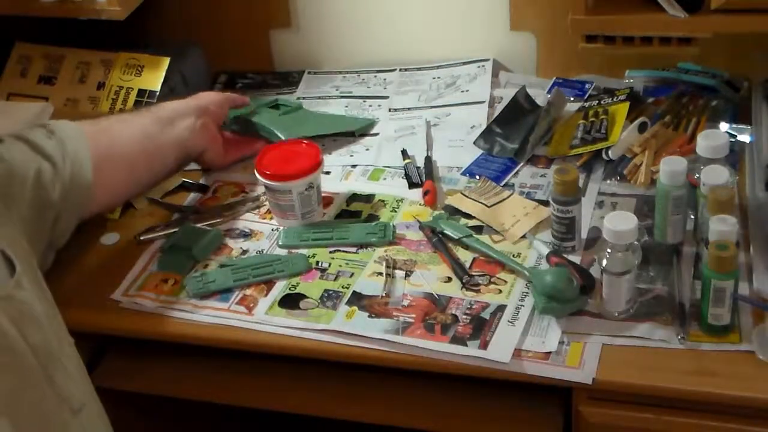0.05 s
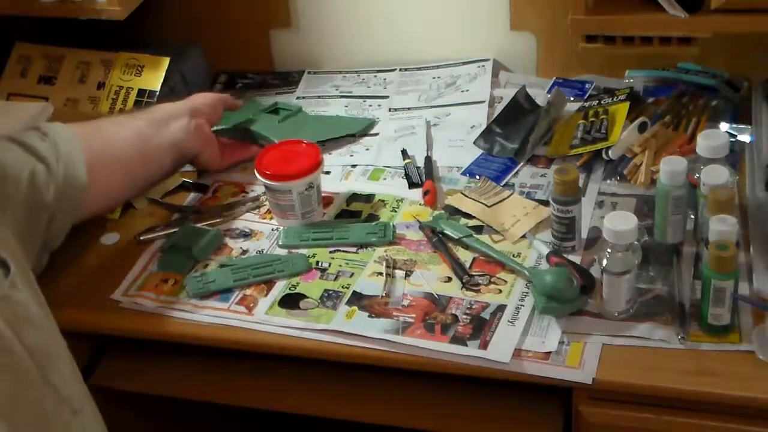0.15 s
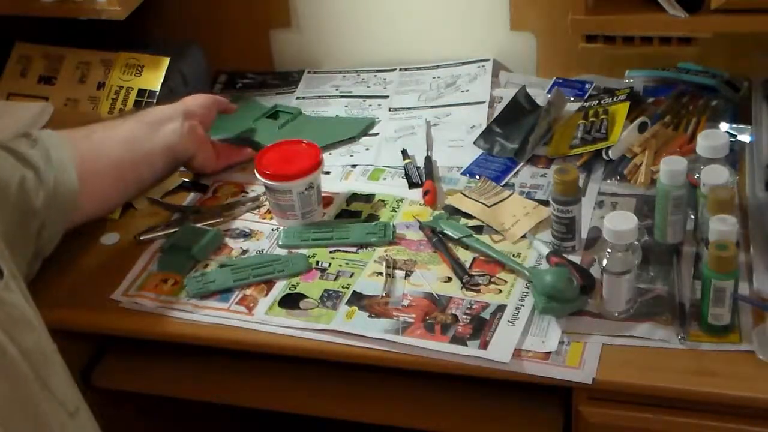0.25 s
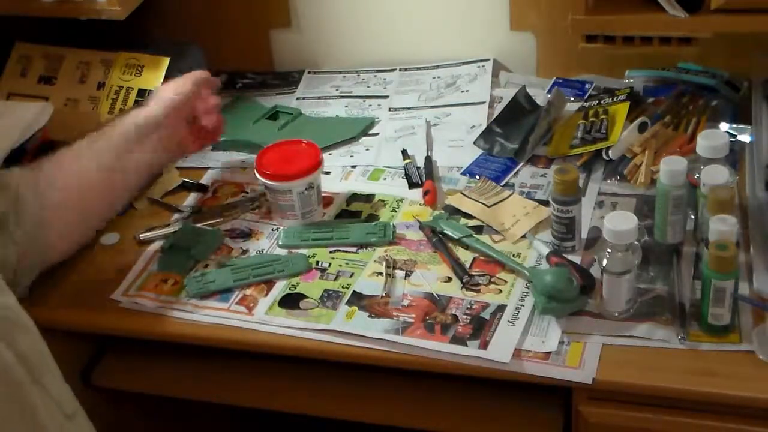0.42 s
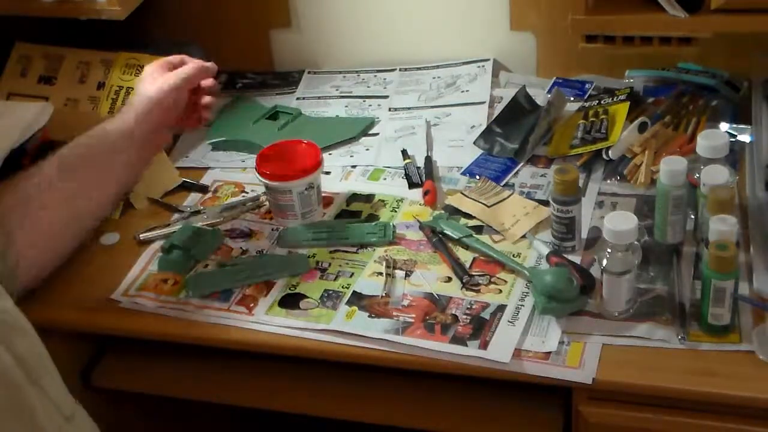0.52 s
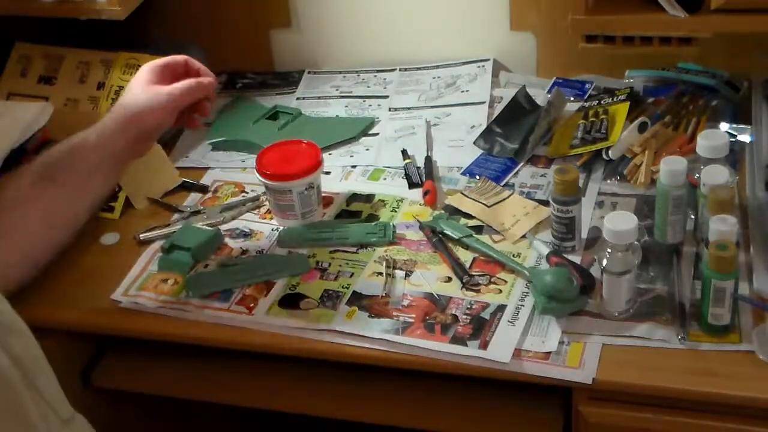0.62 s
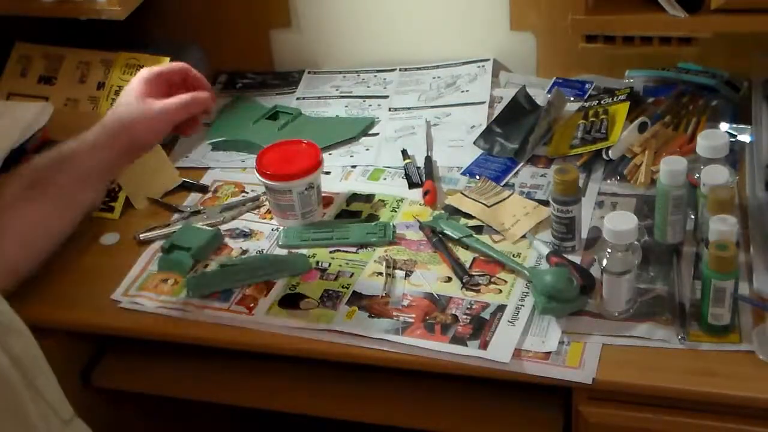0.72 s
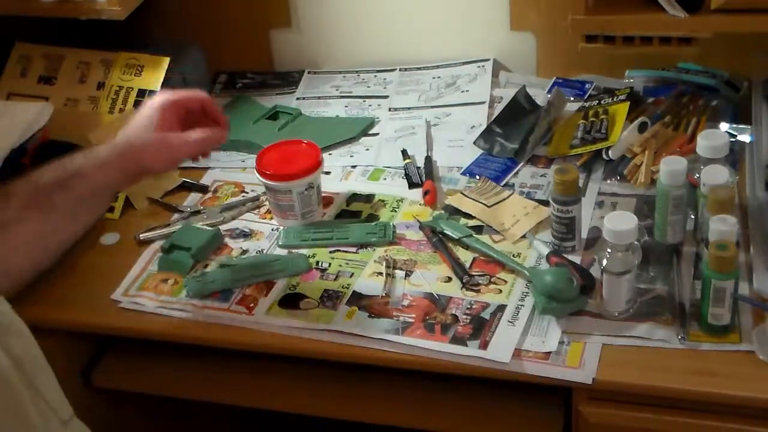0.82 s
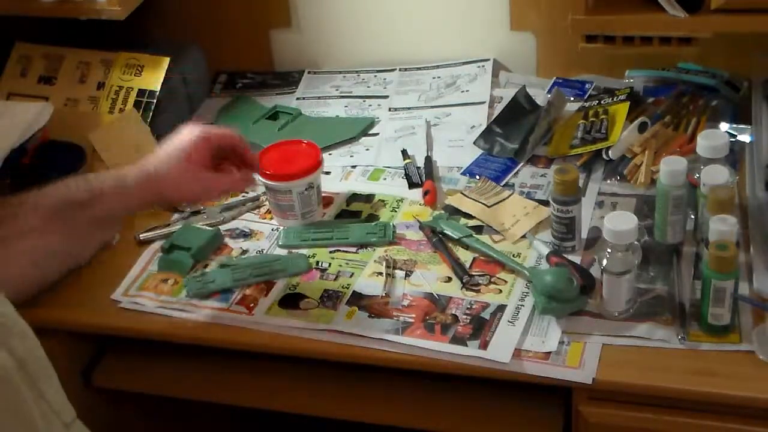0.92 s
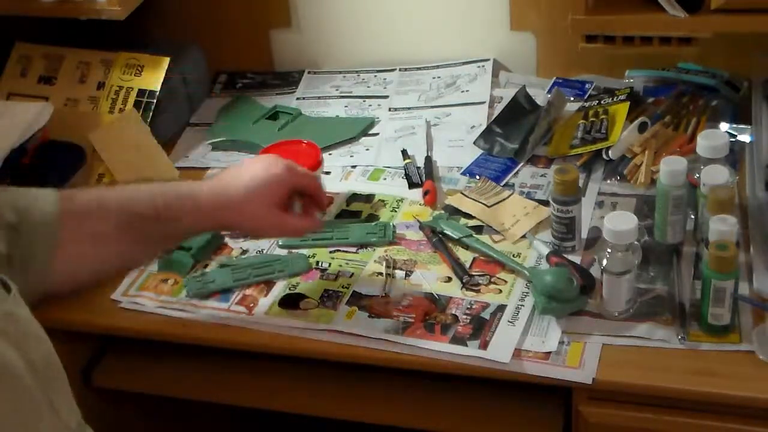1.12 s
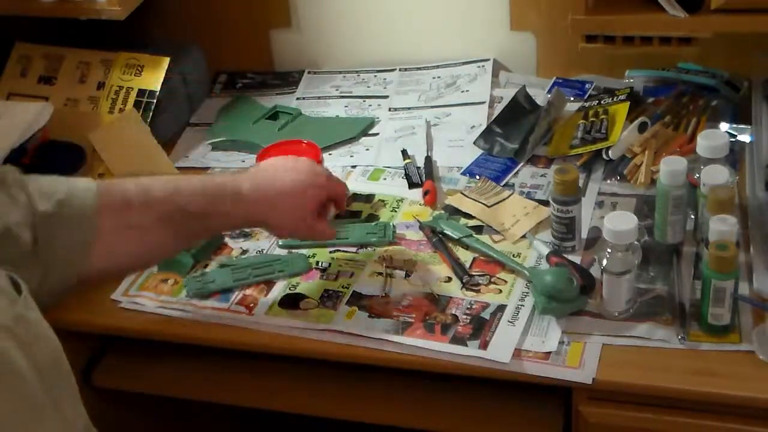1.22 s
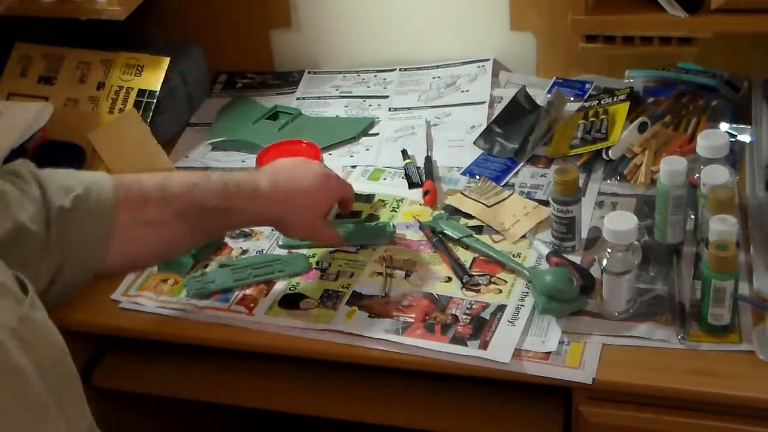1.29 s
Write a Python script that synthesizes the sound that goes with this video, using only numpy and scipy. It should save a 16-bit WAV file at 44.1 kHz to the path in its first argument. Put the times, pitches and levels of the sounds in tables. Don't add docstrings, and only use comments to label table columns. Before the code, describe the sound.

A hollow plastic hull is put down on a newspaper-covered wooden desk, close up in a small room. Faint ticks and paper crackles come at 0.07-0.16 s, a sharp bright knock at 0.24 s, then softer hollow taps crowd together from 0.29 to 0.46 s, fading by 0.6 s. Low rumble and hiss dip around 0.76 s, then recover; barely audible paper ticks follow near 1 s.

```python
import sys
import numpy as np
from scipy import signal
from scipy.fft import rfft, irfft
from scipy.io import wavfile
from scipy.ndimage import uniform_filter1d

SR = 44100
rng = np.random.default_rng(int(sys.argv[2]) if len(sys.argv) > 2 else 0)


def wrap_up_sound(samples):
    columns = np.atleast_2d(samples).T
    tamed = np.clip(columns, -1, 1)
    steps = np.round(tamed * 32767).astype(np.int16)
    wavfile.write(sys.argv[1], SR, steps)


def field_ratio(decibels):
    return 10 ** (np.asarray(decibels, dtype=float) / 20)


N = 59535
LEFT_RIGHT = np.array([[1], [-1]])


def on_log(table, hz):
    table_hz, value = np.array(table).T
    return np.interp(np.log(hz), np.log(table_hz), value)


def unit(x):
    return x / np.sqrt(np.mean(x ** 2))


def band(x, hz, octaves):
    f = np.maximum(np.fft.rfftfreq(x.shape[-1], 1 / SR), 1)
    bell = np.exp(-.5 * (np.log2(f / hz) / octaves) ** 2)
    return irfft(rfft(x) * bell, x.shape[-1])


def walk(rate):
    k = int(SR / rate)
    held = np.repeat(rng.standard_normal(N // k + 1), k)
    return uniform_filter1d(uniform_filter1d(held, k), k)[:N]


def add(out, s, x):
    i = int(s * SR)
    out[i:i + len(x)] += x[:len(out) - i]


def contact_crack(noise, contact_ms):
    lead = 64
    t = np.arange(len(noise)) / SR
    grit = noise * np.exp(-t * 1000 / (28.5 * contact_ms)) * contact_ms
    snap = (t == 0) * 2.2 * (1 - contact_ms) ** 2
    burst = np.roll(grit + snap, lead)
    crack = band(burst, 2410, 0.57) + field_ratio(-29.5) * band(burst, 5500, 0.99)
    return crack / np.abs(crack).max(), lead / SR


# (frequency [Hz], level [dB], decay t60 [s])
SHELL_MODES = [(262, -16, .15), (411, -11, .15), (543, -6, .15), (826, 0, .105), (935, -5, .09),
               (992, 1, .11), (1195, -5, .1), (1253, -8, .13), (1438, -5, .11), (1610, -8, .07),
               (1760, -9, .1), (2120, -11, .07), (2480, -10, .09), (3500, -18, .04)]
# (frequency [Hz], level [dB], decay t60 [s])
DESK_MODES = [(61, -28, 0.13), (138, -14, 0.13), (192, -21, 0.065), (380.2, -14, 0.21), (598.5, -7, 0.13),
              (717, -10, 0.14), (1084, -12, 0.11), (1938, -5.5, 0.053)]
# (time [s], ring level [dB], contact time [ms], crack level [dB])
CONTACTS = [(.110, -51, 0.29, -43.5), (.151, -52, 0.39, -46), (.2407, -25, 0.165, -13.5),
            (0.2427, -36.5, 0.11, -23), (0.2465, -42, 0.16, -22), (.294, -34, 0.44, -42),
            (0.3004, -28, 0.11, -34), (0.32, -32.5, 0.36, -40), (.3065, -61, 0.24, -26),
            (0.3441, -26.5, 0.23, -35), (.349, -33, 0.12, -30), (.358, -37.5, 0.3, -33),
            (.370, -31.5, 0.65, -47), (0.382, -35, 0.25, -44), (0.391, -34.5, 0.35, -50),
            (.403, -37.5, 0.61, -41), (.424, -33, 0.49, -46.5), (.433, -47, .5, -48),
            (0.463, -81, 0.88, -45.5), (.452, -39, 0.17, -48), (.484, -68, 0.58, -53),
            (.513, -49, 0.45, -47.5), (.533, -49.5, 0.28, -41.5), (.592, -54, 0.18, -48)]


def hull_on_desk():
    late_cycles, rise_per_contact = 1.4, 1.0
    scatter_db, detune = 2.5, .007
    out, t = np.zeros(N), np.arange(SR // 3) / SR
    hz, mode_db, t60 = np.vstack([SHELL_MODES, DESK_MODES]).T[:, :, None]
    node_phase = .38 * np.arange(len(hz))[:, None]
    decay = np.exp(-np.log(1000) * t / t60)
    chance = rng.standard_normal((len(CONTACTS), 3, len(hz), 1))
    noises = rng.standard_normal((len(CONTACTS), 2048))
    for (s, db, ms, crack_db), (level, pitch, phase), noise in zip(CONTACTS, chance, noises):
        push = 1 / (1 + (hz * ms / 1000 * 2) ** 2)
        rise_s = late_cycles / hz + ms * rise_per_contact / 1000
        bloom = 1 - np.exp(-(t / rise_s) ** 2)
        turns = hz * (1 + detune * pitch) * t + node_phase + 0.11 * phase
        ring = np.sin(2 * np.pi * turns) * decay
        strength = field_ratio(mode_db + scatter_db * level) * push
        add(out, s, field_ratio(db) * np.sum(strength * bloom * ring, axis=0))
        crack, lead_s = contact_crack(noise, ms)
        add(out, s - lead_s, field_ratio(crack_db) * crack)
    return out


# (time [s], level [dB], centre frequency [Hz], length [ms])
CREASES = [(.069, -58, 3200, 3), (.075, -60, 6500, 5), (.125, -44, 3500, 3), (.125, -57, 9700, 9),
           (.128, -52, 2500, 11), (.128, -50, 4800, 11), (.150, -52, 4400, 9), (.151, -55, 990, 4),
           (.154, -56, 6500, 9), (.158, -57, 2400, 16), (.241, -50, 6500, 14), (.302, -56, 7200, 6),
           (.345, -53, 7300, 6), (.437, -55, 4700, 4), (.438, -61, 8000, 12), (.459, -52, 4700, 3),
           (.459, -60, 7000, 6), (.485, -56, 4000, 2), (.485, -58, 5600, 2), (.486, -63, 7500, 3),
           (.533, -58, 4800, 9), (.535, -64, 10000, 12), (.597, -63, 4500, 4), (.93, -65, 3300, 15),
           (1.005, -65, 4600, 15), (1.04, -65, 4000, 15)]


def newspaper():
    grains_per_ms, grain_cycles = 2.5, 4.0
    thinning_db, spread_db = 5.0, 2.0
    out, t = np.zeros(N), np.arange(400) / SR
    luck = rng.random((len(CREASES), 40, 3))
    for (s, db, hz, ms), u in zip(CREASES, luck):
        for k, (when, pitch, size) in enumerate(u[:1 + int(ms * grains_per_ms)]):
            late = when * (k > 0)
            f = hz * 2 ** (0.046 * ms * (pitch - .5))
            grain = np.sin(2 * np.pi * f * t) * np.exp(-t * f / grain_cycles)
            grain_db = db - thinning_db * late - spread_db * np.log(size + 0.036) + 1.5
            add(out, s + late * ms / 1000, field_ratio(grain_db) * grain)
    return out


def microphone_pair(near):
    return near + field_ratio(-12) * np.gradient(near) * LEFT_RIGHT


# (frequency [Hz], t60 [s])
ROOM_DECAY = [(200, 0.42), (1000, 0.72), (3000, 0.64), (9000, 0.1)]
# (frequency [Hz], level [dB])
ROOM_COLOUR = [(200, 3), (1000, 2), (1800, 4.5), (3500, 1.5), (9000, 7.5)]
# (frequency [Hz], side over mid [dB])
ROOM_WIDTH = [(200, -32), (600, -18), (2000, -11), (8000, 2)]


def room(x):
    gap_s = .006
    t = np.arange(SR * 3 // 4) / SR
    build = 1 - np.exp(-(t / gap_s) ** 2)
    tail = 0
    for hz in 150 * 2 ** np.arange(0, 7., .5):
        mid, side = (unit(band(rng.standard_normal(len(t)), hz, 0.21)) * np.sqrt(hz / 1000) for _ in range(2))
        fade = field_ratio(on_log(ROOM_COLOUR, hz) - 60 * t / on_log(ROOM_DECAY, hz)) * build
        tail = tail + fade * (mid + field_ratio(on_log(ROOM_WIDTH, hz)) * side * LEFT_RIGHT)
    return field_ratio(-15 - 44.5) * signal.fftconvolve(x[None], tail, axes=1)[:, :N]


# (frequency [Hz], density [dB per Hz])
FLOOR_SPECTRUM = [(12, -27), (20, 4.5), (82, -12), (306, -13.5), (760, -21.5), (1000, -20.5), (1790, -29.5),
                  (13300, -41.5), (14500, -41.5)]
# (frequency [Hz], side over mid [dB])
FLOOR_WIDTH = [(60, -11), (110, -8.5), (200, -12), (380, -12), (700, -10), (1280, -8.5), (2370, -2.5),
               (4370, -2), (8050, 1), (14900, -2)]


def rumble_and_hiss():
    swell_db, flicker_db = .3, .8
    out, swell = 0, walk(8)
    for hz in 22 * 2 ** np.arange(0, 9.6, .5):
        mid, side = (unit(band(rng.standard_normal(N), hz, 0.29)) * np.sqrt(hz) for _ in range(2))
        wavering = min(1., 600 / hz)
        db = on_log(FLOOR_SPECTRUM, hz) + (swell_db * swell + flicker_db * walk(9.3)) * wavering
        out = out + field_ratio(db) * (mid + field_ratio(on_log(FLOOR_WIDTH, hz)) * side * LEFT_RIGHT)
    return field_ratio(-51) * out / np.sqrt(np.mean(out.mean(axis=0) ** 2))


def scene():
    near = hull_on_desk() + newspaper()
    return microphone_pair(near) + room(near) + rumble_and_hiss()


# (time [s], gain [dB])
CAMERA_GAIN = [
    (0, 1.5),
    (.23, 3.5),
    (.3, 1),
    (.6, -3),
    (.76, -5),
    (.83, -3),
    (.93, -0.5),
    (1.35, -1),
]


def gain_control(x):
    gain_db = np.interp(np.arange(N) / SR, *np.array(CAMERA_GAIN).T)
    return x * field_ratio(gain_db)


def band_limit(x):
    return signal.sosfilt(signal.butter(12, 15460, fs=SR, output="sos"), x)


def record(dry):
    top_cut = signal.ellip(10, .2, 50, 14150, fs=SR, output="sos")
    mix = signal.sosfilt(top_cut, gain_control(dry))
    return band_limit(mix)


dry = scene()
out = record(dry)
wrap_up_sound(out)
```